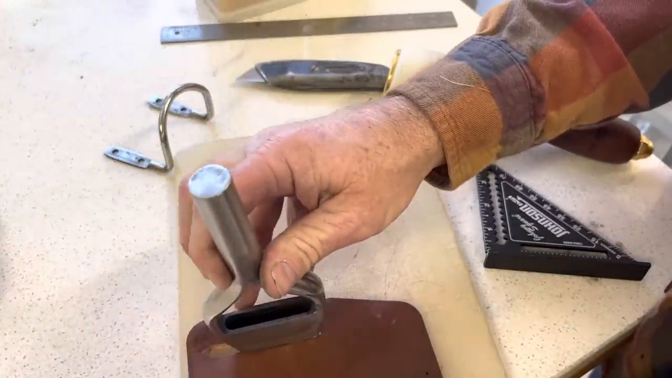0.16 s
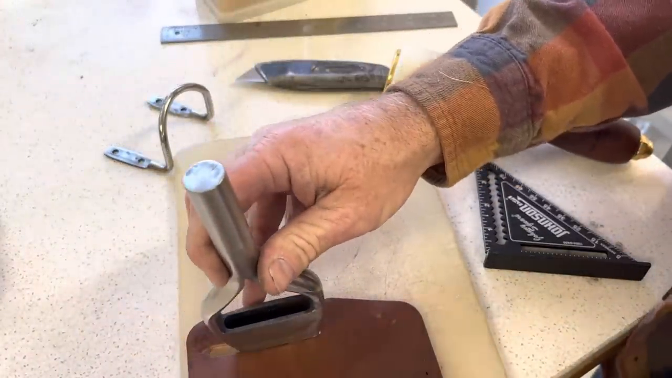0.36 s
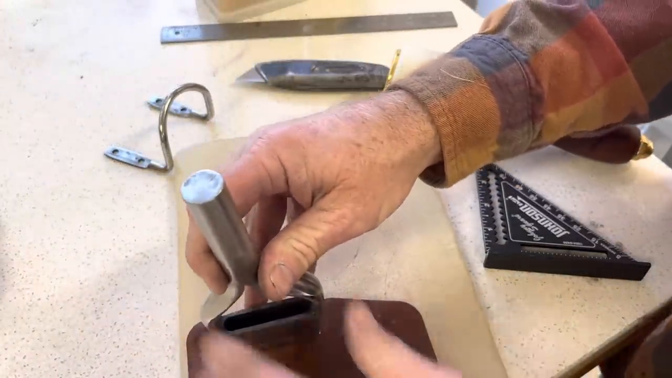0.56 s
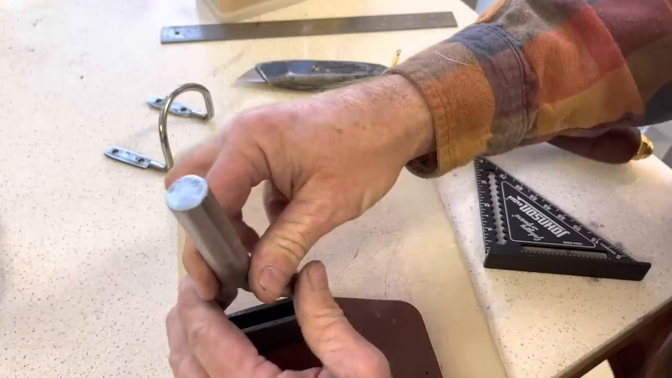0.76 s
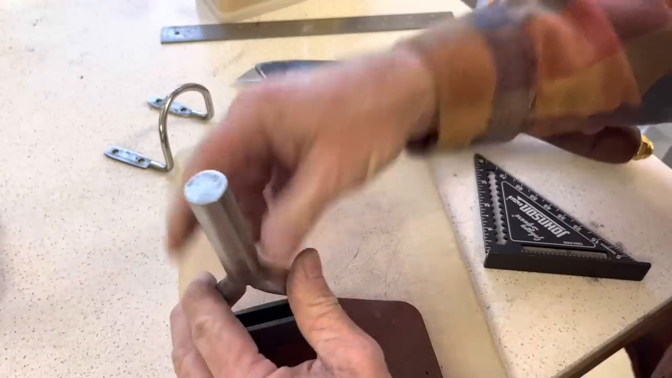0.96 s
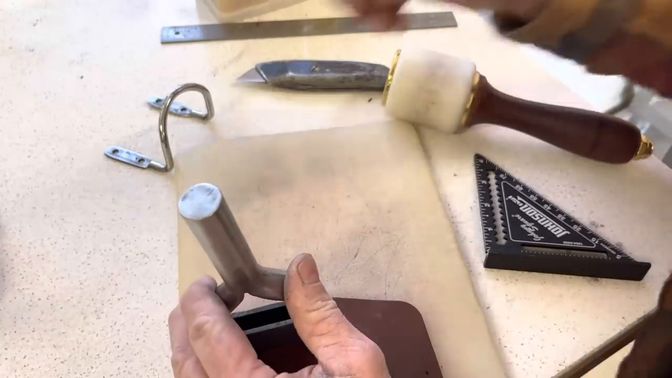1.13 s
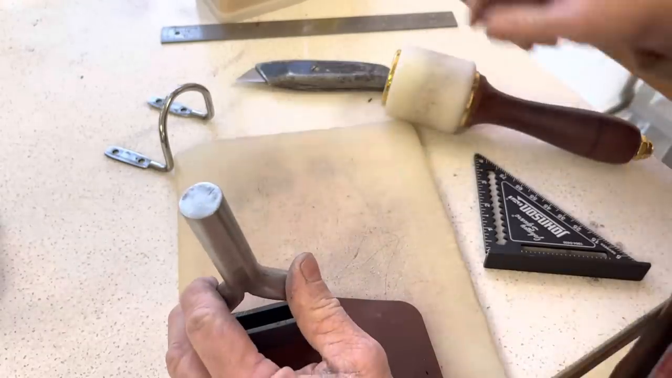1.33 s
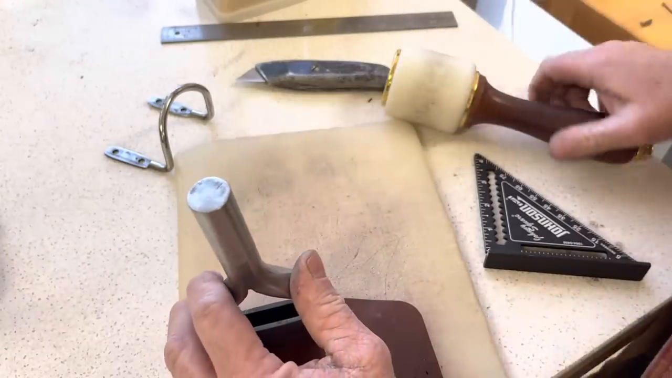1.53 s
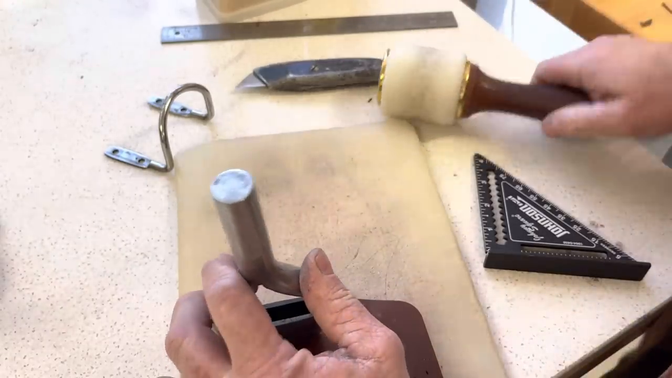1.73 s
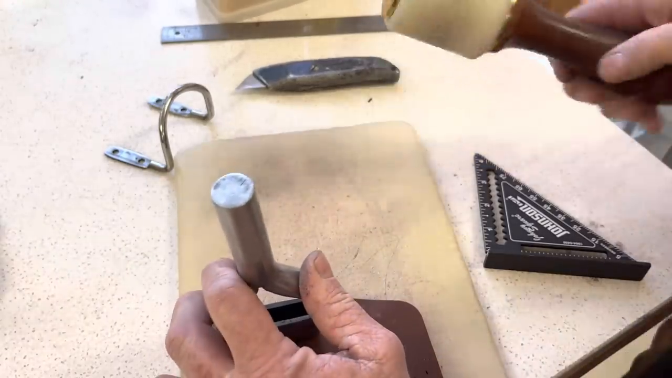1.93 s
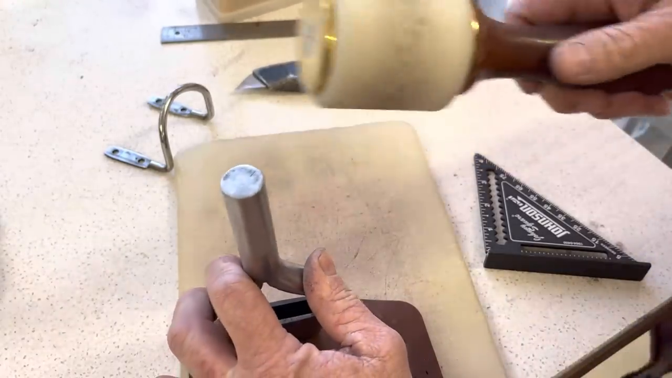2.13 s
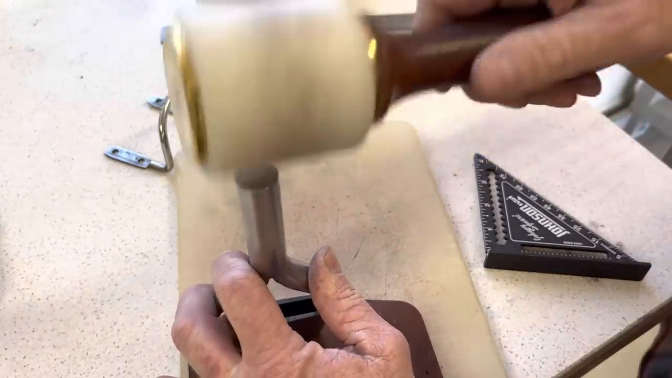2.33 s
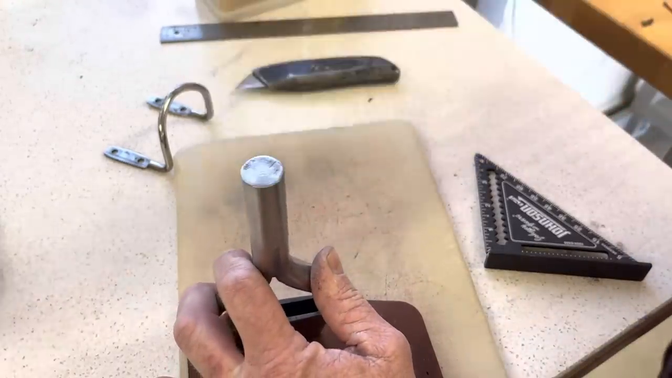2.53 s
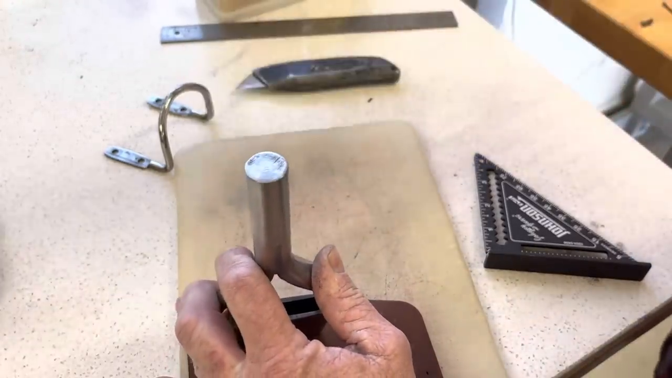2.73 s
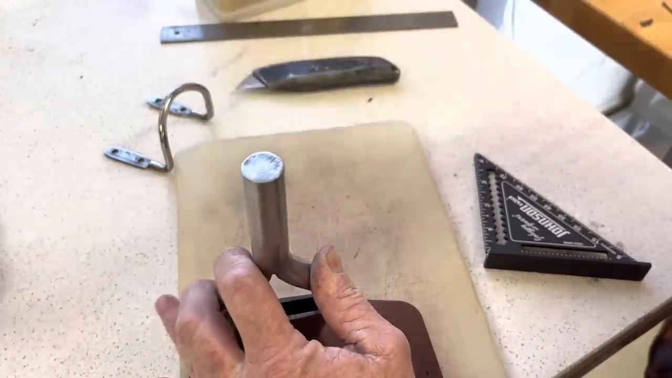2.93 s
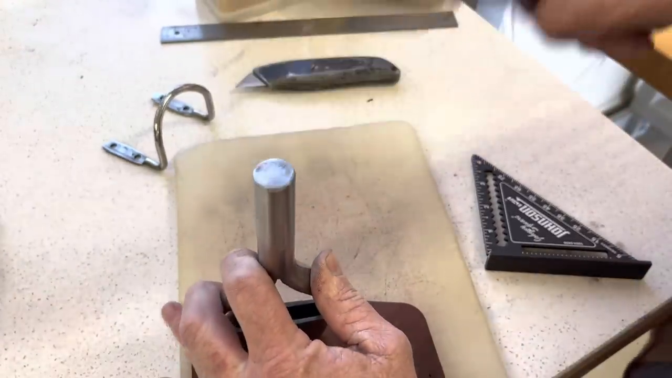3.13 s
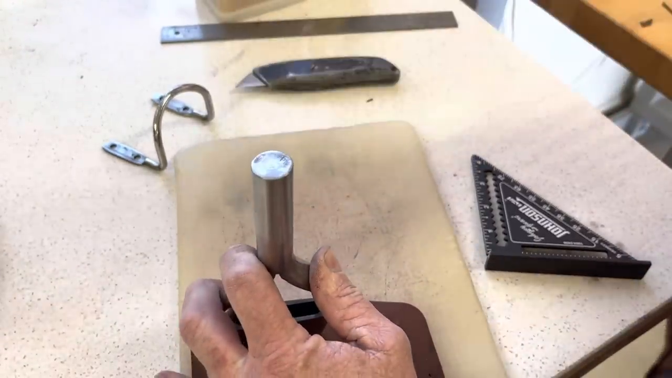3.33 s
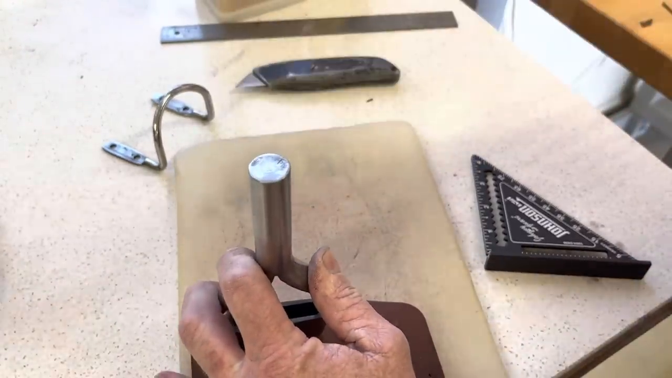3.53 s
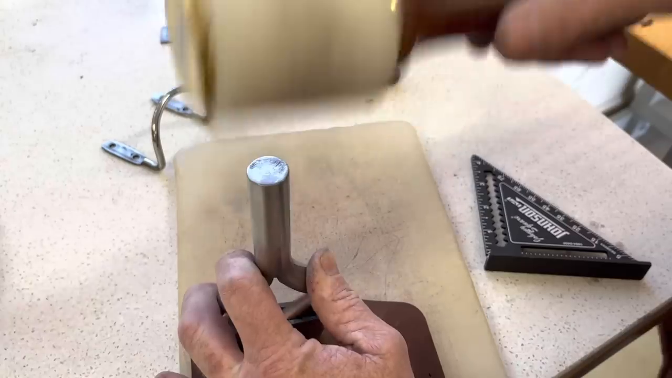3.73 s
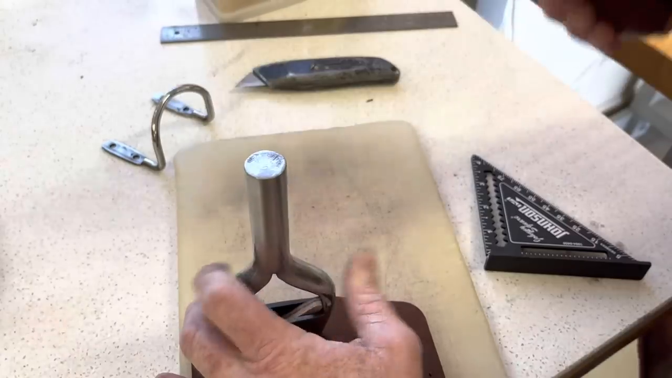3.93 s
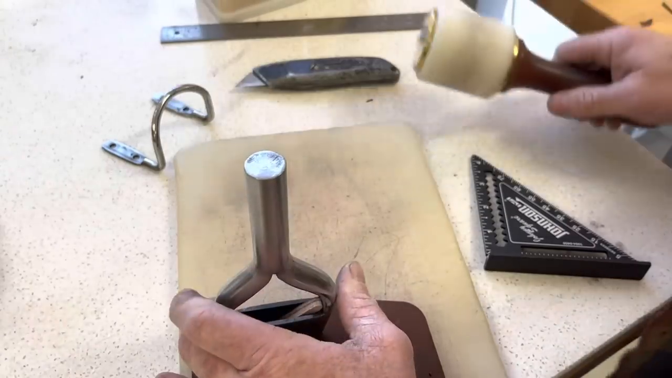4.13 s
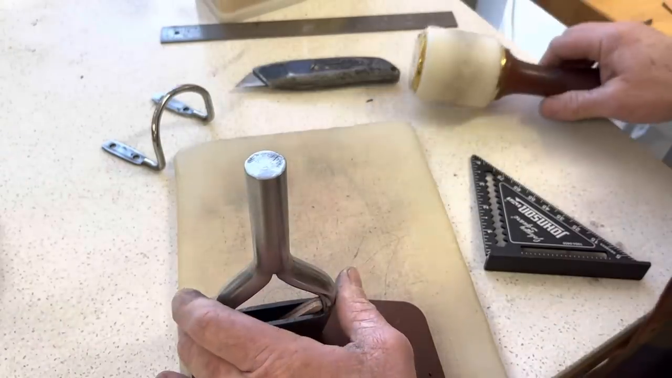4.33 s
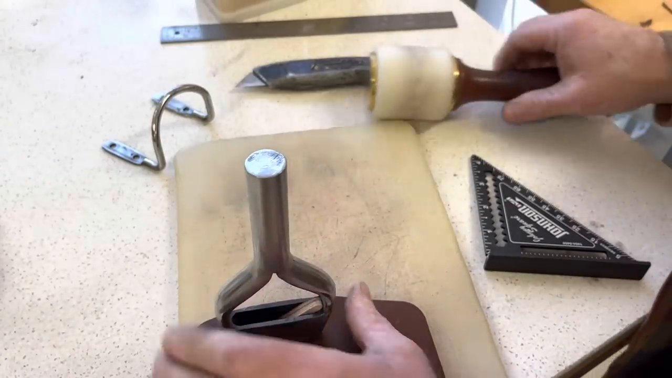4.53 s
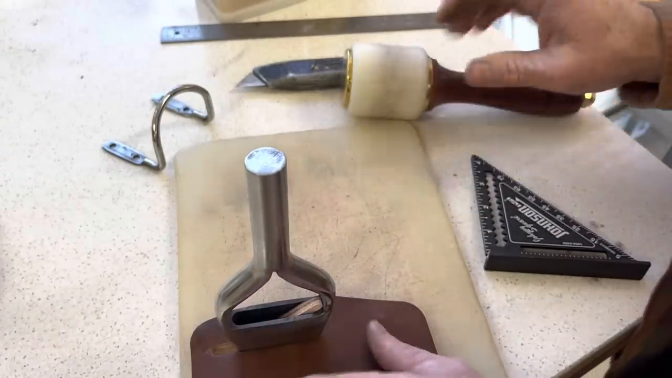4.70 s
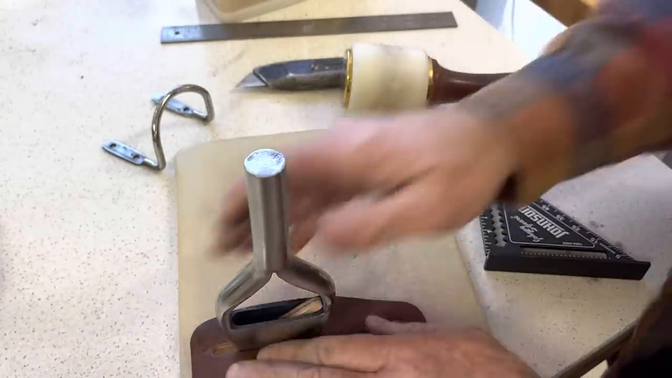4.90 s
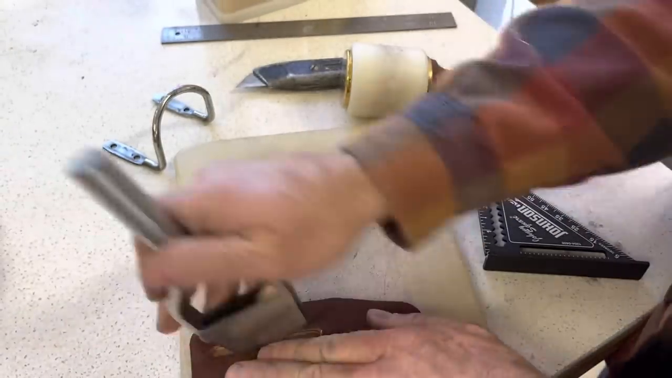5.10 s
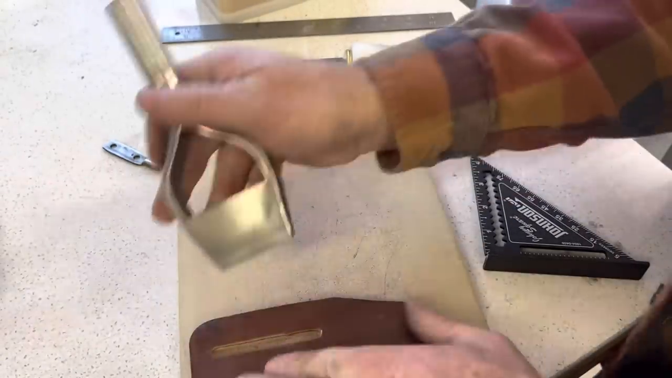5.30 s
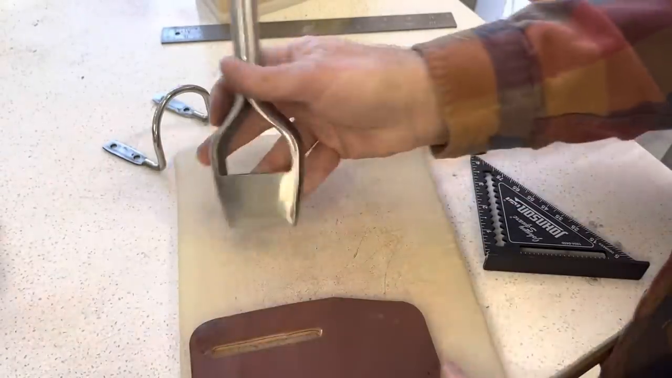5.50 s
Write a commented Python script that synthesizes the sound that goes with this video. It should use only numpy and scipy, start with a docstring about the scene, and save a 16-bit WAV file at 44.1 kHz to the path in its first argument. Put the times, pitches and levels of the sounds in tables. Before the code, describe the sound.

A faint, low workshop hum runs underneath, with slight rustling of hands on leather. At about 1.7 seconds a mallet is lifted from the bench with a soft scuff and a small knock. At 2.3 seconds it gives a steel punch one light, dull tap. At about 3.0 seconds comes a very loud, sharp blow: the punch rings, the bench thuds, and loose steel tools jump and jingle, with a short room echo swelling behind. A second hard blow lands at 3.6 seconds with less ring, followed by a clack and more rattling. Both sound close and slightly squashed, and everything afterwards, including the hum, stays much quieter. Between 4.3 and 4.7 seconds the mallet is laid down, bouncing in a few soft knocks with tiny clinks. Around 5 seconds there is a barely audible scuff as the punch is pulled from the leather.

```python
"""Punching a slot in leather

A mallet is lifted off a workbench, taps a steel punch once to seat it, then drives it through leather
with two hard blows. Loose steel tools jump and jingle; the mallet is laid down, bouncing, and the
punch is pulled free. The blows overload a limiter, which lifts the room's tail as it recovers and
finally stays turned down."""
import sys
import numpy as np
from scipy import signal
from scipy.fft import rfft, irfft, next_fast_len
from scipy.io import wavfile
from scipy.ndimage import uniform_filter1d

SR = 44100
rng = np.random.default_rng(int(sys.argv[2]) if len(sys.argv) > 2 else 0)


def master(y):
    """Save y as 16-bit WAV."""
    cut = np.clip(np.atleast_2d(y).T, -1, 1)
    pcm = np.round(cut * 32767)  # scale
    wavfile.write(sys.argv[1], SR, pcm.astype(np.int16))


N = 245195


def amp(db):
    """Decibels to gain."""
    return 10 ** (np.asarray(db) / 20)


def at_hz(points, hz):
    """Read a curve on a log-frequency axis."""
    f, value = np.transpose(points)
    return np.interp(np.log(np.maximum(hz, 1)), np.log(f), value)


def seconds(length):
    """A time axis."""
    return np.arange(int(length * SR)) / SR


def unit(x):
    """Scale to the energy of 10 ms at rms 1."""
    return x / np.sqrt(np.mean(np.sum(x ** 2, axis=-1)) / (.01 * SR))


def add(out, s, x):
    """Mix a sound in at time s."""
    i = int(s * SR)
    out[:, i:i + x.shape[-1]] += x[..., :N - i]


def soften(x, hz):
    """Two-pole low-pass."""
    return signal.sosfilt(signal.butter(2, min(hz, .45 * SR), fs=SR, output="sos"), x)


def low_cut(x, hz):
    """Two-pole high-pass."""
    return signal.sosfilt(signal.butter(2, hz, "high", fs=SR, output="sos"), x)


# Stereo image, near mono in the bass and wider above: f/Hz, left-right correlation
STEREO_IMAGE = [(80, 0.985), (330, 0.92), (480, 0.69), (750, -0.25), (1500, 0.023), (3000, 0.7),
                (12000, 0.093)]
def spread(mid, side, hz):
    """Blend two noises into left and right, as wide as the image is at hz."""
    alike = at_hz(STEREO_IMAGE, hz)
    return np.sqrt(1 + alike) * mid + np.sqrt(1 - alike) * side * [[1], [-1]]


def noise(spectrum, size):
    """Coloured stereo noise at rms 1."""
    padded = next_fast_len(size, True)
    hz = np.arange(padded // 2 + 1) * SR / padded
    mid, side = rfft(rng.standard_normal((2, padded)))
    x = irfft(spread(mid, side, hz) * amp(at_hz(spectrum, hz)), padded)[:, :size]
    return x / x.std()


def burst(spectrum, t60s, t, order=1):
    """Countless dense modes struck at once: noise that dies at its own pace in each band."""
    out, edges_hz = 0, np.geomspace(50, 17000, 15)
    for low, high in zip(edges_hz, edges_hz[1:]):
        hz = np.sqrt(low * high)
        bandpass = signal.butter(2, [low, high], "band", fs=SR, output="sos")
        mid, side = rng.standard_normal((2, len(t))) * amp(-60 * t / at_hz(t60s, hz))
        band = signal.sosfilt(np.tile(bandpass, (order, 1)), spread(mid, side, hz) + 1e-18)
        out = out + unit(band) * np.sqrt(high - low) * amp(at_hz(spectrum, hz))
    return unit(out)


def ring(modes, t, onset_cycles=0.19):
    """Decaying sines that speak within a cycle, widened by a phase lead on the left."""
    out = 0
    for hz, db, t60 in modes:
        skew = np.arccos(at_hz(STEREO_IMAGE, hz)) * np.array([[.5], [-.5]])
        envelope = amp(db - 60 * t / t60) * (1 - np.exp(-t * hz / onset_cycles))
        out = out + envelope * np.sin(2 * np.pi * hz * t + skew)
    return out


# Room tone spectrum: f/Hz, relative level/dB
HUM = [(12, -58.5), (20, -21), (36, -19), (55, 3.5), (95, -10), (193, -13), (347, -14.5), (759, -27.5),
       (1910, -34.5), (3070, -45.5), (4810, -46.5), (7310, -59.5), (8410, -76), (10200, -58.5),
       (12400, -56), (16000, -68.5)]
def hum(level_db=-51.5):
    """The workshop's steady hum: a bed of bass-heavy noise."""
    return amp(level_db) * noise(HUM, N)


# Reverb colour: f/Hz, relative level/dB
ROOM_COLOUR = [(60, 5), (110, 7.5), (200, 4), (350, 2), (650, -2.5), (1200, -4.5), (3000, -7.5), (4500, -4),
               (6500, -2.5), (8500, -19.5), (15000, -14)]
# Reverb decay: f/Hz, t60/s
ROOM_T60 = [(100, 0.79), (400, 0.73), (1200, 0.71), (3000, 0.76), (6000, 0.61), (9500, .2), (13000, .12)]
def room_tail(x, wet_db=-16.5, build_s=0.0044):
    """A diffuse tail that builds up as the first reflections come back."""
    t = seconds(0.95)
    reflections = burst(ROOM_COLOUR, ROOM_T60, t, order=2) * (1 - np.exp(-t / build_s))
    impulse_response = unit(reflections) / np.sqrt(.01 * SR)
    return amp(wet_db) * signal.fftconvolve(x, impulse_response, axes=1)[:, :N]


# Friction colour, for rustle and scuffs: f/Hz, relative level/dB
BRUSH = [(150, 3), (700, 1.5), (2200, -4), (4500, -5), (7000, -5.5), (8300, -8), (11500, -0.5),
         (14000, -4.5), (16000, -27)]
# Fader ride of the hands' rustle: t/s, level/dB
RUSTLE_RIDE = [(0, -73.5), (.2, -77), (.33, -90), (.43, -81), (.6, -68), (.72, -72.5), (.8, -79.5),
               (.88, -77), (1.08, -74.5), (1.19, -81), (1.3, -78.5), (1.85, -71), (2.2, -82.5), (2.68, -70),
               (2.8, -82.5), (2.91, -71), (3.1, -81), (5.56, -71)]
def hand_rustle(swing_db=2.5):
    """The hands shift their grip: a faint, uneven rustle comes and goes."""
    level_db = np.interp(np.arange(N) / SR, *np.transpose(RUSTLE_RIDE))
    restless = np.tanh(noise([(15, 0.5), (40, -27.0), (200, -84)], N)[0])
    return amp(level_db + swing_db * restless) * noise(BRUSH, N)


# Scuff cues: t/s, level/dB, attack/s, low cut/Hz, high cut/Hz
SCUFFS = [(0.115, -68, 0.014, 1500, 6000), (0.43, -62, 0.062, 2500, 12500),
          (0.634, -59.5, 0.022, 2490, 11000), (0.679, -65.5, .008, 3000, 13000),
          (0.921, -65.5, 0.003, 2500, 12500), (1.213, -50, 0.0094, 1500, 6000),
          (1.322, -65.5, 0.017, 2000, 4000), (1.405, -55, 0.022, 2500, 3860),
          (1.485, -67.5, 0.0226, 10000, 14000), (1.631, -44, 0.0206, 603, 3680),
          (1.687, -52.5, 0.015, 2000, 5000), (1.844, -63.5, 0.052, 9000, 14000),
          (1.93, -57, 0.022, 3500, 13800), (1.951, -44, 0.25, 200.4, 420),
          (1.998, -58.5, 0.013, 6000, 14000), (2.085, -72.5, 0.0044, 1490, 6924),
          (2.614, -62, 0.0016, 2998, 13980), (4.70, -47.5, 0.19, 1000, 7081),
          (4.951, -48, 0.0069, 1200, 4033), (4.986, -43.5, 0.0095, 793.5, 3530),
          (5.11, -56.5, 0.0077, 1001, 7006), (5.29, -56, 0.038, 998.6, 6980)]
def scuffs(grain_db=4):
    """Fingers, sleeve and punch brush the leather: grainy friction rises and fades with each move."""
    out, t = np.zeros((2, N)), seconds(0.977)
    for s, db, rise_s, low_hz, high_hz in SCUFFS:
        friction = noise(BRUSH, len(t))
        grain = amp(grain_db * noise([(200, -18.5), (800, -39.5)], len(t))[0])
        band = low_cut(soften(friction * grain, high_hz), low_hz)
        add(out, s, amp(db) * unit(band * t * np.exp(-t / rise_s)))
    return out


# Sub-bass modes of the bench on its legs: f/Hz, level/dB, t60/s
LEG_MODES = [(45.66, -13.5, 0.845), (52.75, -8.5, 0.635)]
def bench_sway(heave_hz=28.4, heave_db=5, heave_t60=0.053, inertia_hz=80):
    """The bench heaves under each blow and rocks after the last, too heavy to start abruptly."""
    out, t = np.zeros((2, N)), seconds(0.92)
    heave_lag_s, rock_lag_s = .012, 0.0702
    for s, crack_db, *_ in BLOWS:
        add(out, s + heave_lag_s, ring([(heave_hz, crack_db + heave_db, heave_t60)], t))
    add(out, BLOWS[-1][0] + rock_lag_s, ring(LEG_MODES, t))
    return soften(out, inertia_hz)


# Clink cues: t/s, f/Hz, level/dB, t60/s
CLINKS = [(1.222, 2110, -46.5, 0.073), (1.455, 2149, -56, 0.069), (1.691, 2256, -37.5, 0.034),
          (2.338, 4570, -42, 0.12), (2.339, 1666, -20, 0.081), (3.709, 1695, -6, 0.028),
          (3.709, 2284, -6, 0.054), (3.71, 2630, -8.5, 0.042), (4.365, 3270, -29.5, 0.06),
          (4.37, 5690, -51, 0.372), (4.371, 5026, -49, 0.33), (4.614, 3350, -39, 0.041),
          (4.618, 3949, -45, 0.13)]
def clinks():
    """A single touch of steel on steel wakes just one mode of a tool."""
    out = np.zeros((2, N))
    for s, hz, db, t60 in CLINKS:
        add(out, s, ring([(hz, db, t60)], seconds(.4)))
    return out


# Colour of steel ticking on the bench: f/Hz, relative level/dB
CHATTER = [(500, -20), (2000, -11.5), (4500, -16.5), (7000, -11), (8300, -27), (9700, -9.5), (11500, -6.5),
           (13400, -7.5), (14200, -25), (16000, -22.5)]
# Modes of the loose tools: f/Hz, relative level/dB, t60 before bench damping/s
TOOL_MODES = [(3274, -5, .13), (3985, -17, .18), (5087, -17, .18), (6335, -15, .15), (6640, -14, .14),
              (9383, -14, .15), (10035, -6, .14), (10796, -2, .15), (11238, -2, .14), (12372, -6, .15),
              (12411, -5, .15), (13033, -1, .14), (13182, -5, .15), (13491, -2, .13), (14832, -6, .13)]
def rattle(length_s, ring_db, touches_per_s=500, tick_t60=0.071, scatter_db=1.5, ring_rise_s=0.0017):
    """A quick run of uneven touches builds up the tools' ring; the bench top shortens it."""
    t, damping = seconds(.28), 0.94
    touches = (rng.random(len(t)) < touches_per_s / SR) * rng.standard_normal(len(t)) * (t < length_s)
    touches[0] = 1.5  # a firm first hit
    tick = noise(CHATTER, len(t)) * amp(-60 * t / tick_t60)
    chatter = unit(signal.fftconvolve(tick, touches[None])[:, :len(t)])
    struck = [(hz, db + scatter_db * rng.standard_normal(), t60 * damping) for hz, db, t60 in TOOL_MODES]
    build_up = np.sqrt(np.cumsum(touches ** 2)) * (1 - np.exp(-t / ring_rise_s))
    return unit(chatter + amp(ring_db) * unit(ring(struck, t) * build_up))


# Jingle cues: t/s, level/dB, run of touches/s, ring over chatter/dB
JINGLES = [(2.339, -29.5, 0.003, -9), (2.97, 0, 0.045, -2), (3.0272, 7, 0.018, 2.5),
           (3.0646, -2.5, 0.0066, 20), (3.088, -19, 0.025, 14.5), (3.632, -4, 0.025, -8),
           (3.6578, -2.5, 0.019, 0.5), (3.682, -0.5, 0.0205, 3.5), (3.713, -12, 0.0265, -3.5),
           (4.356, -28.5, 0.011, -17), (4.365, -20, 0.018, -16), (4.417, -38.5, 0.0113, -13),
           (4.606, -37, .012, -22), (4.616, -31, .016, -6)]
def jingles():
    """Thrown up by a jolt, steel tools rattle, land and settle."""
    out = np.zeros((2, N))
    for s, db, length_s, ring_db in JINGLES:
        add(out, s, amp(db) * rattle(length_s, ring_db))
    return out


# Modes of the contact's snap: f/Hz, relative level/dB, t60/s
SNAP_MODES = [(755, -1.5, 0.013), (918, -0.53, 0.016)]
# Modes of the bench's boom: f/Hz, relative level/dB, t60/s
BENCH_MODES = [(59.4, -22, 0.18), (97.6, -15.5, 0.22), (109.9, -18.5, 0.4), (162.6, -15.5, 0.12),
               (207.3, -8.5, 0.087), (283, 0, 0.051), (339.6, 1, 0.035), (385, -1, 0.072), (470, -5, 0.07),
               (527, -8.5, 0.06), (669.3, -11, 0.12), (755, -20.5, 0.097), (871.4, -20.5, .08)]
# Clack colour: f/Hz, relative level/dB
CLACK = [(60, -13.5), (150, -4.5), (350, 2), (700, 2.5), (1100, 1.5), (1600, 1.5), (2200, -5.5), (4500, -8),
         (8000, -16.5), (13000, -25)]
# Clack decay: f/Hz, t60/s
CLACK_T60 = [(150, 0.073), (700, 0.1), (2000, 0.076), (12000, 0.28)]
# Knocks and bounces: t/s, level/dB, high cut/Hz, clack over snap/dB, boom over contact/dB,
# boom tilt/(dB per octave)
KNOCKS = [(1.660, -44, 1300, 12, -7, 4), (1.681, -51, 600, 2, 15, -7), (1.6905, -40.5, 3500, 3, -18, -2.5),
          (1.7024, -28, 1392, -5, 6.5, 1), (2.3348, -12.5, 3450, -2, -6, -2),
          (2.3476, -27, 2630, 14.5, 8.5, -2.5), (2.367, -24.5, 1998, -4.5, 6.5, -3),
          (2.3745, -35, 900, 13, 6, 0.5), (2.419, -46, 796, 11, 9, 1), (2.959, -1, 110, -3, -3, -10),
          (3.028, -9.5, 3500, -5, -1.5, -1.5), (3.619, -11, 110, 0, -1, -6), (3.707, -3, 5000, 1, -9, -1),
          (3.734, -16, 4950, 5, -8, -5.5), (3.827, -23.5, 150, 12.5, -1, -3.5),
          (4.353, -18, 1240, -1, -0.5, -2), (4.4173, -20.5, 1167, -5, 0, -2), (4.478, -29.5, 987, 4, 7, -1),
          (4.603, -24.5, 997.2, 6, 4, -3), (4.612, -21, 1000, -1.5, -4.5, 0), (4.653, -37.5, 693, 10, 8, 2),
          (5.001, -47.5, 459.2, 4, 5, -5.5)]
def knocks(boom_rise_s=0.0018, contact_rise_s=0.0003, scatter_db=1.5):
    """A contact snaps and sets the bench top clacking and booming; a soft one is dull."""
    out, t = np.zeros((2, N)), seconds(0.25)
    snap = unit(ring(SNAP_MODES, t))
    for s, db, contact_hz, clack_db, boom_db, tilt_db in KNOCKS:
        clack = amp(clack_db) * burst(CLACK, CLACK_T60, t)
        contact = (snap + clack) * (1 - np.exp(-t / contact_rise_s))
        dulled = unit(soften(soften(contact, contact_hz), contact_hz))
        struck = [(hz, mode_db + tilt_db * np.log2(hz) + scatter_db * rng.standard_normal(), t60)
                  for hz, mode_db, t60 in BENCH_MODES]  # each spot favours other modes
        boom = unit(ring(struck, t) * (1 - np.exp(-t / boom_rise_s)))
        add(out, s, amp(db) * (dulled + amp(boom_db) * boom))
    return out


# Lead-ins: crack's t/s, level/dB, noise over tone/dB, overtones as (f/Hz, relative level/dB)
SWELLS = [(2.9542, 0.5, -8, [(2762, -24), (5292, -21.5), (6718, -28)]), (3.617, -4, -11, [(4436, -16.5),
          (7187, -29.5)])]
def swells(tone_hz=1652, rise_s=0.0075, lead_s=.03, left_db=-22, waver=0.54, overtone_db=-8):
    """A brief, rough, steely tone, mostly on the right, swells into each hard crack."""
    out, t = np.zeros((2, N)), seconds(lead_s)
    growth = (np.exp(t / rise_s) - 1) / np.exp(lead_s / rise_s)
    grit_colour = [(100, -4.5), (300, 2.5), (850, 1.0), (2500, -22.5), (3700, -30), (6800, -17.5),
                   (8500, -42.5)]
    for s, db, grit_db, overtones in SWELLS:
        flutter = 1 + waver * noise([(150, 2.0), (500, -48.5)], len(t))[0]
        pings = sum(amp(level + overtone_db) * np.sin(2 * np.pi * hz * t) for hz, level in overtones)
        tone = growth * np.sin(2 * np.pi * tone_hz * t) + growth ** .4 * pings  # overtones come in early
        grit = amp(grit_db) * growth * noise(grit_colour, len(t))
        add(out, s - lead_s, amp(db) * (tone * flutter * amp([[left_db], [0]]) + grit))
    return out


# Mallet hits: t/s, crack level/dB, ring level/dB, thump's starting f/Hz, its first octave's fall/s,
# thump over crack/dB, thump attack/s
BLOWS = [(2.3364, -24, -70, 380, .05, 15, .0065), (2.9547, 17.5, -10, 1446, .0012, -6.5, .003),
         (3.6163, 13, -24.5, 1455, .0008, -9.5, .0045)]
def thumps():
    """As the edge bites, a dead thump swells, sags in pitch and is choked by the leather."""
    out, t = np.zeros((2, N)), seconds(.05)
    for s, crack_db, _, hz, sag_s, thump_db, peak_s in BLOWS:
        cycles = np.cumsum(hz / (1 + t / sag_s)) / SR
        envelope = t * np.exp(-.5 * (t / peak_s) ** 2)
        add(out, s, amp(crack_db + thump_db) * unit(np.sin(2 * np.pi * cycles) * envelope))
    return out


# Crack colour: f/Hz, relative level/dB
CRACK = [(100, 1.5), (250, -4), (450, -3), (900, 2.5), (1500, 0.5), (2300, -8), (3500, -11), (5500, -11),
         (8000, -21), (12000, -11), (16000, -28)]
# Crack decay: f/Hz, t60/s
CRACK_T60 = [(200, 0.054), (700, 0.017), (2000, 0.0025), (12000, 0.012)]
# Other tools humming in sympathy: f/Hz, level over crack/dB, t60/s
SYMPATHY_MODES = [(1052, -49, 1.6), (1210, -51.5, 0.92), (1278, -52.5, 1.0), (1373, -50, .8)]
# Modes of the steel punch: f/Hz, relative level/dB, t60/s
PUNCH_MODES = [(1701, -13, .5), (2304, -9, .5), (3268, -3, .58), (3276, -6, .4), (4005, -12, .6),
               (4452, -12, .6), (5082, -16, .55), (5362, -11, .6), (5621, -5, .6), (5658, -11, .55),
               (5984, -13, .5), (6340, -12, .55), (6630, -9, .42), (9740, 1, .38), (9781, 2, .43),
               (10030, -5, .33), (11853, 4, .43), (11861, -3, .43), (15170, 2, .3)]
def mallet_blows(ring_rise_s=0.015):
    """Mallet on punch: a crack, then the steel's ring swells as the mallet leaves it."""
    out, t = np.zeros((2, N)), seconds(0.958)
    punch = ring(PUNCH_MODES, t) * (1 - np.exp(-t / ring_rise_s))
    sympathy = ring(SYMPATHY_MODES, t)
    for s, crack_db, ring_db, *_ in BLOWS:
        add(out, s, amp(crack_db) * burst(CRACK, CRACK_T60, seconds(0.12)))
        add(out, s, amp(ring_db) * punch + amp(crack_db) * sympathy)
    return out


def scene(board_hz=55, send_cut_hz=370, jingle_send_db=-7, thump_send_db=-6):
    """Everything on the bench, with a send to the room, over the workshop's hum."""
    contacts = mallet_blows() + knocks() + clinks() + scuffs()
    bench = low_cut(contacts, board_hz)  # a board radiates little deep bass
    tools, thud = jingles(), thumps()
    send = low_cut(bench + amp(thump_send_db) * thud, send_cut_hz)  # thumps are heard mostly close by
    room = room_tail(send + amp(jingle_send_db) * tools)
    return bench + thud + tools + room + swells() + bench_sway() + hand_rustle() + hum()


def limiter(x, limit_db=-9, release_db_per_s=75, overload_db=12, held_db=19):
    """Ducks at once and recovers steadily; from the second overload on it stays turned down."""
    release_db = release_db_per_s * np.arange(N) / SR
    power = uniform_filter1d(np.mean(x ** 2, axis=0), size=132)  # 3 ms detector
    over_db = np.maximum(10 * np.log10(np.maximum(power, 1e-12)) - limit_db, 0)
    cut_db = np.maximum.accumulate(over_db + release_db) - release_db
    overload_starts = np.diff((cut_db > overload_db).astype(int), prepend=0) > 0
    cut_db = np.maximum(cut_db, held_db * (np.cumsum(overload_starts) >= 2))
    return x * amp(-uniform_filter1d(cut_db, size=40))


def record(dry, dip_hz=8300, dip_q=1.9, dip_db=-15, roll_off_hz=13200, top_cut_hz=15900):
    """The microphone's treble dip and roll-off, then limiter, soft clipping and a steep top cut."""
    notched = signal.lfilter(*signal.iirnotch(dip_hz, dip_q, fs=SR), dry)
    dipped = notched + amp(dip_db) * (dry - notched)
    rolled_off = signal.sosfilt(signal.butter(4, roll_off_hz, fs=SR, output="sos"), dipped)
    rounded = np.tanh(limiter(rolled_off))
    return signal.sosfilt(signal.ellip(12, .1, 110, top_cut_hz, fs=SR, output="sos"), rounded)


dry = scene()
out = record(dry)
master(out)
```